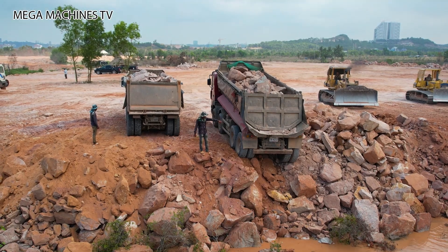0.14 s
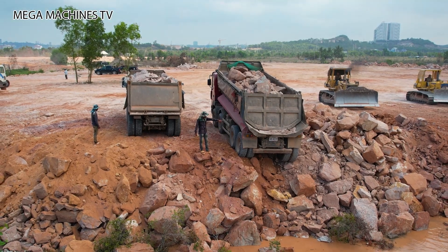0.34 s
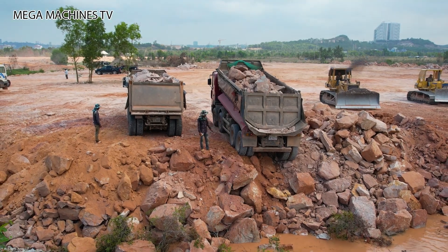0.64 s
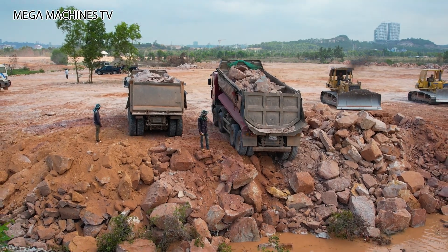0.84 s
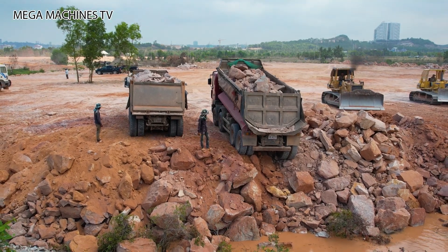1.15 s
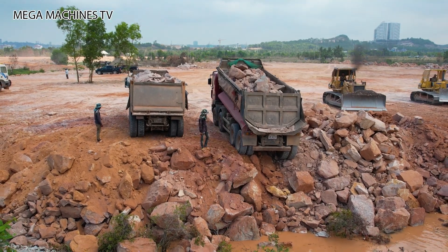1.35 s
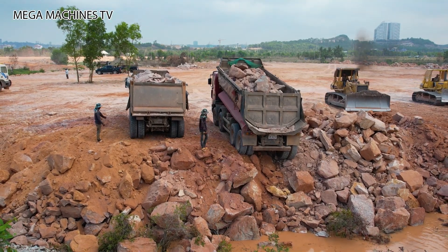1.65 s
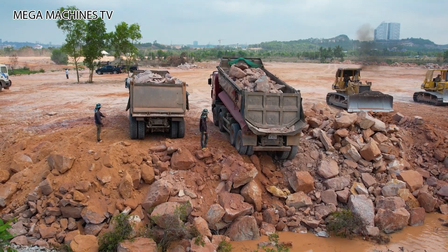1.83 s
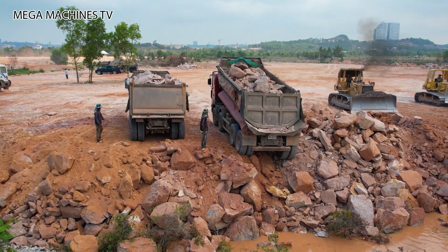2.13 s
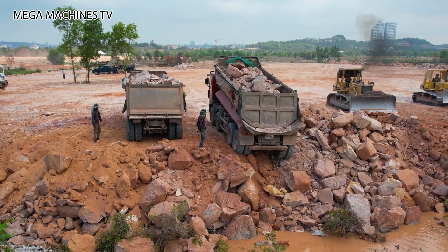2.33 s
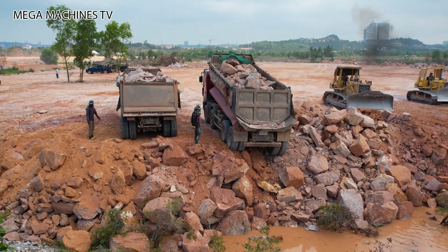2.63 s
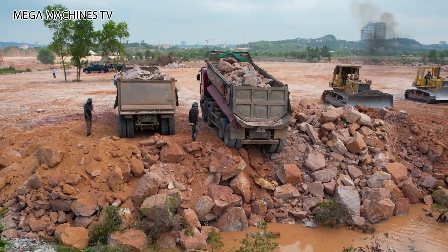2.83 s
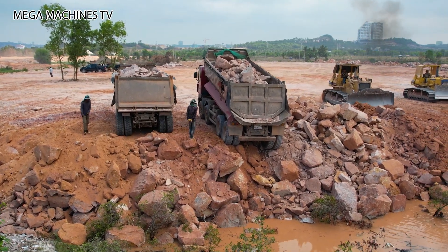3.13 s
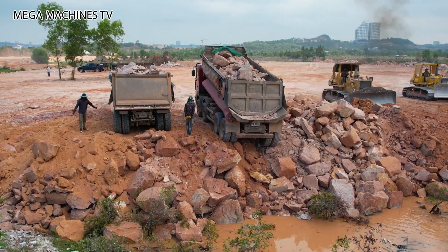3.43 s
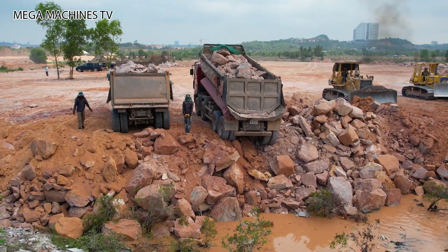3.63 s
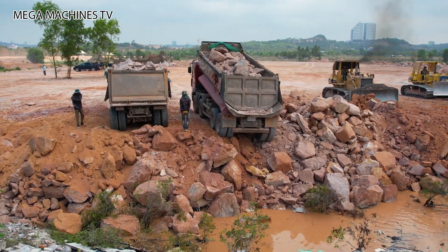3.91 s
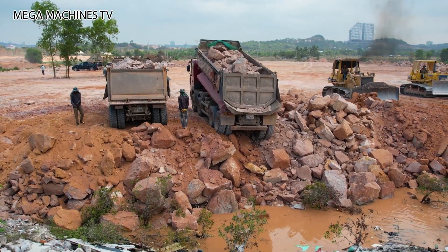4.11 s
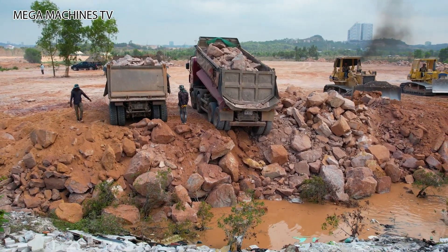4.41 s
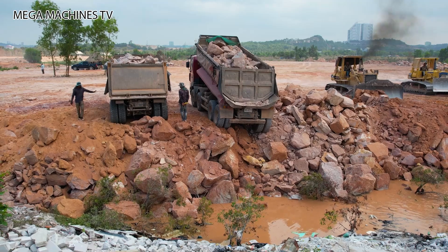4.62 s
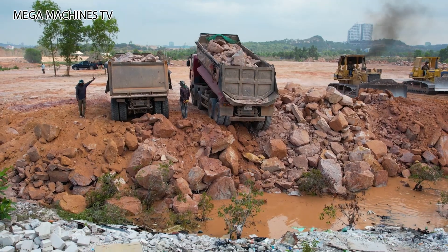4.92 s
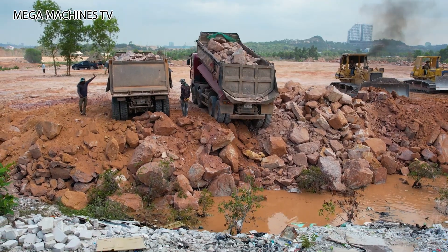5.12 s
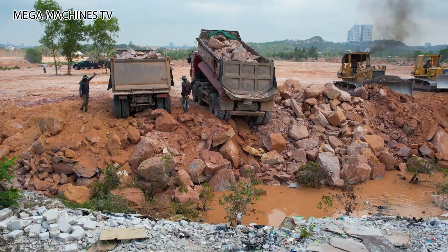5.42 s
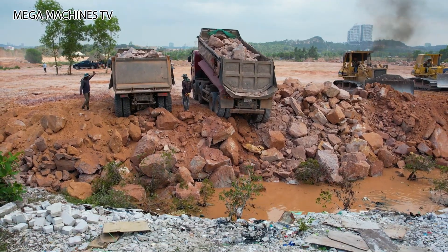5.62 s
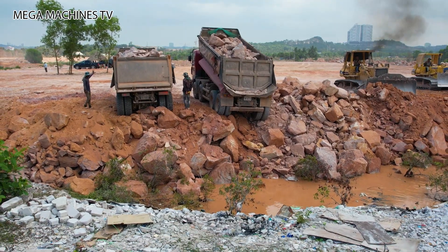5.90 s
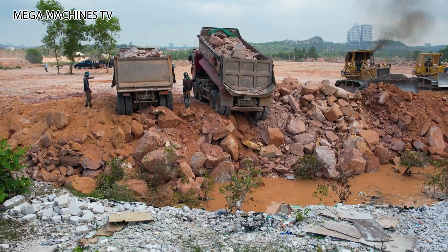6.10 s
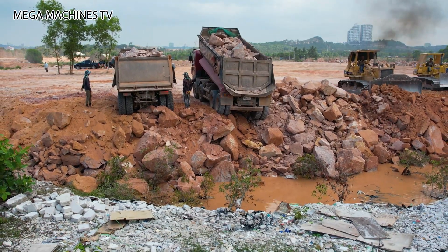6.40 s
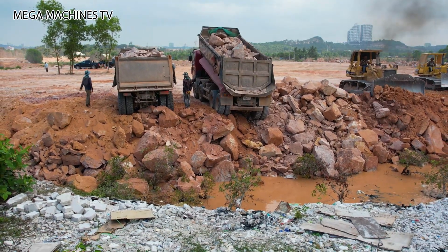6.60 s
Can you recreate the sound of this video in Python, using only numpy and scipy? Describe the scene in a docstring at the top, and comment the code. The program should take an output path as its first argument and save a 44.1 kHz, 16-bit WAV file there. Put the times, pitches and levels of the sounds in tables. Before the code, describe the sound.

Outdoors at an earth and rock site, in wide stereo, a bulldozer's deep, nearly pure diesel boom dominates, with pulsing rumble, growl and piston clatter. At 0.23 s the throttle shuts: the boom drops out and pitch sinks until 0.9 s, with a clack and faint squeaks near 0.3 s. It then revs up, loudest around 2.1 s and highest near 3.9 s, before sagging and weakening, with brief cuts at 4.7 and 5.6 s. Fine track clinks run throughout, stronger after 4 s. A tipping truck's engine bogs down between 2 and 3 s; another truck hums at idle. High squeaks and a dull bump come at 2.3 s, squeaks, knocks and a short scrape around 2.8 s, a gritty crack at 3.46 s. Rock knocks and steel clacks cluster from 4.3 to 5.5 s; tiny squeaks follow at 6.3 s. Soft bright hiss persists.

```python
"""A bulldozer drones on an open earth site: its boom drops out, revs up and sags as it drives off on clinking tracks.
One truck idles and another labours to tip its load; steel squeaks and clacks, and rocks knock over a steady hiss.
Engines are sine tones that follow the firing rate, plus coloured noise that pulses with each firing.
Tracks are random clicks through ringing steel, knocks are short bursts of ringing noise, and squeaks are gliding tones.
The sound is stereo: left and right differ in phase, and the noises also in level and fine detail."""
import sys
import numpy as np
from scipy import signal
from scipy.fft import rfft, irfft
from scipy.io import wavfile

SR = 44100
rng = np.random.default_rng(int(sys.argv[2]) if len(sys.argv) > 2 else 0)


def inscribe(sig):
    """Save sig as 16-bit PCM at rate SR to the path in sys.argv[1].

    A 1-D sig is mono; a 2-D sig holds one channel per row.
    Samples are clipped to [-1, 1] before scaling.
    """
    pcm = np.round(np.clip(np.atleast_2d(sig).T, -1, 1) * 32767)
    wavfile.write(sys.argv[1], SR, pcm.astype(np.int16))


N = 297675
TIME = np.arange(N) / SR  # [s]
FREQS = np.maximum(np.arange(N // 2 + 1) * SR / N, 1)  # [Hz], kept above zero


def exhaust(firings):
    """A nearly pure boom at the firing rate, as loud as the load; unequal cylinders add weak half orders."""
    # load on the engine, as the level of its boom: (time [s], level [dB])
    engine_load = [(0, -20.5), (.2, -20), (.95, -31), (1.3, -22.5), (2.1, -18.5), (3, -21), (3.9, -21.5),
                   (4.5, -24.5), (5.45, -25), (5.8, -29.5), (6.75, -29.5)]
    # exhaust overtones: (multiple of the firing rate, relative level [dB])
    overtone_table = [(.5, -31), (2, -17), (3, -27), (4, -28.5), (6.5, -36), (7, -42), (9, -35)]
    boom_waver_db, boom_flutter_db = 0.5, 0.35  # slow and fast swelling of the boom
    overtone_waver_db = 2.5  # each overtone swells on its own
    overtone_wander = 0.3  # and slips against the boom [turns]

    load_db, = in_time(engine_load)
    level_db = load_db - let_ups()
    boom_db = level_db + boom_waver_db * drift(2.2) + boom_flutter_db * drift(21)
    boom = from_db(boom_db) * sine(firings)

    # the overtones swell less with load than the boom does
    overtone_db = -21.5 + 0.45 * (level_db + 19.5)
    overtones = np.zeros(N)
    for multiple, db in overtone_table:
        gain = from_db(db + overtone_waver_db * drift(5))
        overtones += gain * sine(multiple * firings + overtone_wander * drift(1.2))
    return lag_sides(boom + from_db(overtone_db) * overtones)


def let_ups():
    """Decibels that the boom loses while the driver eases the throttle."""
    # easing of the throttle: (start [s], length [s], depth [dB])
    eased = [(0.234, 0.71, 16), (4.73, 0.13, 11), (5.596, 0.082, 10)]
    drop_s, pick_up_s = 0.023, 0.036  # the boom fades and comes back

    loss_db = np.zeros(N)
    for start, length, depth_db in eased:
        falling = (TIME - start) / drop_s
        returning = 1 - (TIME - start - length) / pick_up_s
        loss_db += depth_db * np.clip(np.minimum(falling, returning), 0, 1)
    return loss_db


def engine_noise(firings, firing_hz):
    """Exhaust gas rumbles and growls with each firing; pistons clatter louder with speed."""
    # level of the exhaust noise: (time [s], low rumble [dB], growl [dB])
    noise_levels = [(0, -36, -37), (.4, -37.5, -38), (.8, -36.5, -40.5), (1.3, -33.5, -42),
                    (1.8, -36.5, -39.5), (2.3, -35, -37.5), (3.2, -34.5, -37.5), (4.2, -35.5, -36),
                    (4.9, -38, -37.5), (5.8, -33.5, -37), (6.75, -39, -39.5)]
    # tone colour of each noise: (frequency [Hz], strength [dB per Hz])
    rumble_colour = [(110, 0), (150, -1.5), (200, 1.5), (240, -2.5), (275, -10)]
    growl_colour = [(280, 1.5), (350, 2), (430, -2), (490, 2.5), (560, -0.5), (640, -2), (790, -1),
                    (900, -10.5)]
    clatter_colour = [(750, -8), (880, 0.5), (990, 2.5), (1080, 1), (1200, 3), (1400, -1), (1600, -2),
                      (2050, -4.5), (2550, -6), (2800, -10), (3300, -13), (3650, -9), (4200, -23),
                      (4700, -58)]
    # share of each noise's power that comes as one pulse per firing
    rumble_pulses, growl_pulses, clatter_pulses = 0.36, 0.17, 0.05
    working_hz = 79.6  # firing rate at which the clatter has its basic level
    clatter_basic_db, clatter_db_per_hz, clatter_surge_db = -39, 0.04, 0.6

    rumble_db, growl_db = in_time(noise_levels)
    rumble = wide_noise(colour(rumble_colour), combustion(firings, rumble_pulses))
    rumble *= from_db(rumble_db + 0.93 * drift(10.3)) * throb(firings, depth=0.22)

    growl = wide_noise(colour(growl_colour), combustion(firings, growl_pulses))
    growl *= from_db(growl_db + 1.06 * drift(25)) * throb(firings, depth=0.067)

    clatter_db = clatter_basic_db + clatter_db_per_hz * (firing_hz - working_hz)
    clatter_gain = colour(clatter_colour) * uneven_spectrum(strength=0.42)
    clatter = wide_noise(clatter_gain, combustion(firings, clatter_pulses))
    clatter *= from_db(clatter_db + clatter_surge_db * drift(8.5))
    return rumble + growl + clatter


def combustion(firings, share):
    """One pulse per firing, uneven in strength and timing; the rest is turbulent gas."""
    spread_db, jitter_s = 2.2, 0.0009  # no two firings are alike
    starts = np.flatnonzero(np.diff(np.floor(firings)))
    chances = rng.standard_normal((1024, 2))[:len(starts)]
    late, strength = np.clip(chances.T, -2, 2)
    places = (starts + late * jitter_s * SR).astype(int) % N
    pulses = np.zeros(N)
    pulses[places] = from_db(spread_db * strength)
    return np.sqrt(share) * rms_one(pulses) + np.sqrt(1 - share) * rng.standard_normal(N)


def tracks(clinks_per_s=170):
    """Steel links drop onto rollers and stones in uneven clusters."""
    # crawler tracks as the bulldozer moves off: (time [s], level [dB])
    track_level = [(0, -52.5), (2, -51.5), (4.6, -47.5), (6.75, -49)]
    # what a track link rings with: (frequency [Hz], width [Hz], level [dB])
    link_modes = [(1244, 29, 1), (1392, 44, 14), (1863, 59, 11.5), (2060, 34, 15), (2318, 19, 12),
                  (2690, 45, -11), (3600, 58, -23)]

    chance = clinks_per_s * from_db(3 * drift(9)) / SR  # of a clink at each sample
    struck = rng.random((2, N)) < chance
    clicks = struck * rng.standard_normal((2, N))
    clicks = clicks + 0.029 * clicks[::-1]  # each side gets a little of the other
    ringing = irfft(rfft(clicks) * resonances(link_modes), N)
    level_db, = in_time(track_level)
    return from_db(level_db) * rms_one(ringing)


def tipper():
    """The tipping truck's engine booms at its firing rate, under overtones that follow the same rate."""
    # the engine sags as it lifts the load: (time [s], firing rate [firings per s])
    tipper_speed = [(0, 101), (1.2, 99), (1.8, 97), (2.3, 89), (2.9, 71), (4.2, 73.3), (6.75, 69)]
    # its sound: (time [s], boom [dB], overtones [dB])
    tipper_levels = [(0, -37, -62), (1, -34, -58), (2, -34.5, -54), (2.6, -48, -49), (3.7, -43, -40),
                     (5, -48, -46), (6.75, -43, -39.5)]
    # those overtones: (multiple of the firing rate, relative level [dB])
    tipper_tone = [(1.5, -3.5), (2, -3.5)]

    firing_hz, = in_time(tipper_speed)
    boom_db, overtone_db = in_time(tipper_levels)
    firings = np.cumsum(firing_hz * (1 + 0.0039 * drift(5.6))) / SR
    boom = from_db(boom_db + 1.8 * drift(2.1)) * sine(firings)
    overtones = np.zeros(N)
    for multiple, db in tipper_tone:
        gain = from_db(overtone_db + db + 2 * drift(4.1))
        overtones += gain * sine(multiple * firings + rng.random())
    return lag_sides(boom + overtones)


def trucks():
    """One truck hums on its engine orders, another throbs lower down, over a low rumble."""
    # idling truck: (time [s], firing rate [firings per s])
    idle_speed = [(0, 33.7), (2.8, 33.6), (4.6, 32.2), (6.75, 31.6)]
    # level of its hum: (time [s], level [dB])
    hum_level = [(0, -40.5), (1, -40.5), (2.6, -43), (4.6, -50), (6, -40), (6.75, -37)]
    # lines of the hum: (multiple of the firing rate, relative level [dB])
    hum_lines = [(6, 0), (9, -19), (14, -11), (15, -16), (18, -14), (24, -18), (35, -19)]
    # colour of the low rumble: (frequency [Hz], strength [dB per Hz])
    ground_colour = [(27, -35), (35, -16), (43, 3), (60, 3.5), (85, 7), (120, -1), (160, -27)]
    hum_waver_db = 2.0  # each line swells on its own
    throb_hz, throb_db = 41.6, -46  # the other truck

    firing_hz, = in_time(idle_speed)
    hum_db, = in_time(hum_level)
    firings = np.cumsum(firing_hz * (1 + 0.002 * drift(5.5))) / SR
    hum = np.zeros(N)
    for multiple, db in hum_lines:
        gain = from_db(hum_db + db + hum_waver_db * drift(7.8))
        hum += gain * sine(multiple * firings + rng.random())

    throb_turns = np.cumsum(throb_hz * (1 + 0.015 * drift(2.8))) / SR
    low_throb = from_db(throb_db + 2 * drift(3.3)) * sine(throb_turns)
    rumble = from_db(-38.5) * throb(firings, depth=0.088) * wide_noise(colour(ground_colour))
    return lag_sides(hum + low_throb) + rumble


def clacks():
    """Steel hits steel: each clack starts at once and rattles out briefly around its own pitch."""
    # clacks: (start [s], pitch [Hz], width [Hz], level of the first 10 ms [dB], time to fall 60 dB [s])
    clack_table = [(0.266, 2900, 1150, -35.5, .055), (3.902, 2580, 250, -40, .05),
                   (4.336, 2590, 250, -42, .04), (4.45, 2000, 300, -41, .07), (4.59, 2000, 350, -38, .09),
                   (4.755, 2100, 300, -41, .05), (4.955, 2000, 300, -41, .07), (5.05, 1780, 300, -39, .06),
                   (5.305, 2950, 800, -38.5, .07), (5.311, 2080, 450, -34.5, .09),
                   (5.447, 2000, 300, -40, .04), (5.858, 2050, 400, -39, .06), (5.973, 1980, 300, -40, .05)]

    out, age = np.zeros(N), TIME[:SR // 5]
    for s, hz, width, db, t60 in clack_table:
        edges = [hz - width / 2, hz + width / 2]
        band = signal.butter(2, edges, "band", fs=SR, output="sos")
        burst = rng.standard_normal(len(age)) * from_db(-60 * age / t60)
        ring = signal.sosfilt(band, burst)
        start = int(s * SR)
        out[start:start + len(age)] += from_db(db) * ring / rms(ring[age < .01])
    return lag_sides(out)


def squeaks():
    """Dry steel sticks and slips at a high pitch that swells, glides, flutters if rough and rings on faintly."""
    # squeaks: (start [s], length [s], pitch [Hz], level before the side balance [dB],
    #           glide [share of pitch], roughness [0-1], octave overtone [dB])
    squeak_table = [(0.35, 0.038, 5980, -46, -0.0071, 0.3, -8), (0.338, .035, 7890, -49, 0, .2, -30),
                    (2.303, 0.065, 5510, -36.5, -0.00092, 0.28, -18),
                    (2.411, 0.039, 5480, -37, 0, 0.3, -16), (2.436, 0.132, 5470, -47, -0.0088, 0.2, -25),
                    (2.55, .1, 5470, -54, -.004, .3, -25), (2.688, 0.04, 5140, -43, -0.022, 0.4, -25),
                    (2.786, 0.023, 6990, -45, 0, .3, -30), (2.81, 0.034, 7050, -40.5, 0.0078, 0.16, -30),
                    (2.873, 0.023, 7000, -50, 0, 0.4, -30), (3.357, 0.29, 769, -48.5, 0.0018, .2, -27),
                    (3.452, 0.038, 5670, -49, 0.0072, .6, -25), (5.554, 0.033, 5350, -53, 0.0064, 0.4, -25),
                    (6.237, 0.03, 4870, -47, 0, 0.35, -25), (6.272, 0.03, 6040, -43.5, -0.017, 0.4, -25),
                    (6.315, 0.03, 4800, -52, 0.0034, 0.5, -25),
                    (6.34, 0.063, 4920, -51, -0.0081, 0.76, -25), (6.324, 0.03, 6000, -53, 0, 0.25, -25)]
    ring_share, ring_s = 0.23, 0.059  # strength and fading time of the ring after each squeak
    pitch_waver, flutter_db = 0.011, 5  # at full roughness: share of pitch, level
    side_phase = np.array([[0], [.12]])  # left, right [turns]

    out, waver, flutter = np.zeros((2, N)), drift(100), drift(70)
    for s, length, hz, db, glide, rough, overtone_db in squeak_table:
        span = slice(int(s * SR), int((s + length + .25) * SR))
        age = np.maximum(TIME[span] - s, 0)
        along = np.minimum(age / length, 1)  # 0 at the start, 1 at the end
        swell = np.abs(np.sin(np.pi * along)) ** 0.49
        swell += ring_share * along * np.exp(-np.maximum(age - length, 0) / ring_s)
        pitch = hz * (1 + rough * pitch_waver * waver[span] + glide * along)
        turns = np.cumsum(pitch) / SR + side_phase
        tone = sine(turns) + from_db(overtone_db) * sine(2 * turns)
        out[:, span] += from_db(db + rough * flutter_db * flutter[span]) * swell * tone
    return out * from_db([[-1.5], [1.2]])  # a little louder on the right


def rocks():
    """Each knock is a gritty crack and a short ring of the stone."""
    # rocks knocking: (start [s], body [dB], crack [dB])
    knock_table = [(1.92, -38, -54), (2.804, -38, -50), (2.882, -44, -49), (3.135, -40.5, -43),
                   (3.462, -45, -35), (4.10, -56, -43), (4.571, -38, -46), (4.695, -39, -44),
                   (4.808, -38, -45)]
    # what a rock rings with: (frequency [Hz], width [Hz], level [dB])
    rock_modes = [(1300, 300, -15), (2020, 300, 21), (2500, 300, -3), (3000, 670, 9), (3750, 250, -15)]
    # colour of the crack: (frequency [Hz], strength [dB per Hz])
    crack_colour = [(3500, 7), (5700, 5), (7300, 5), (10000, 7.5), (15000, -16)]

    s, body_db, crack_db = np.transpose(knock_table)
    body_gain = np.abs(resonances(rock_modes)) * colour([(700, 0), (3600, 0)])
    body = blows(s, body_db, rise=0.0011, t60=0.18) * wide_noise(body_gain)
    crack_gain = colour(crack_colour) * uneven_spectrum(strength=0.96)
    crack = blows(s, crack_db, rise=0.0051, t60=0.2) * wide_noise(crack_gain)
    return body + crack


def load_bumps():
    """A shifting load bumps the tipper: a dull, low burst of noise that dies away."""
    # bumps: (start [s], level [dB])
    bump_table = [(2.322, -23)]
    dull = colour([(115, -14), (150, -1), (190, -4), (240, -12)])
    return blows(*np.transpose(bump_table), rise=0.0024, t60=0.28) * wide_noise(dull)


def scrapes():
    """Stone grates over the steel tipper body and keeps its narrow modes ringing."""
    # scrapes: (start [s], length [s], level [dB])
    scrape_table = [(2.795, 0.064, -37), (2.872, 0.055, -43)]
    # what the steel rings with: (frequency [Hz], width [Hz], level [dB])
    steel_modes = [(1933, 20, 1), (2240, 44, -2), (3140, 37, -3), (3680, 32, -3), (3820, 31, -4),
                   (4120, 50, -13), (5250, 90, -9.5), (5660, 70, -11), (6500, 70, -15)]

    s, length, db = np.transpose(scrape_table)
    along = np.clip((TIME - s[:, None]) / length[:, None], 0, 1)
    pressure = from_db(db) @ np.sqrt(np.abs(np.sin(np.pi * along)))
    steel_gain = np.abs(resonances(steel_modes)) * colour([(1500, 0), (8000, 0)])
    return pressure * from_db(1.2 * drift(60)) * wide_noise(steel_gain)


def hiss():
    """Fans and sliding grit hiss: bright noise whose level flickers slightly."""
    # level of the hiss: (time [s], level [dB])
    hiss_level = [(0, -47), (3.2, -44), (6, -46)]
    # its colour: (frequency [Hz], strength [dB per Hz])
    hiss_colour = [(3300, 3), (4300, 6), (5500, 5.5), (6800, 6.5), (8000, 5), (9200, -2), (10500, 4),
                   (12500, 0), (15500, -5.5)]
    flicker_db = 0.5

    level_db, = in_time(hiss_level)
    gain = colour(hiss_colour) * uneven_spectrum(strength=0.34)
    return from_db(level_db + flicker_db * drift(24)) * wide_noise(gain)


def uneven_spectrum(strength, count=10):
    """A random fine unevenness of the noise's spectrum, different in each layer, as gain by frequency."""
    # each random delay and size adds one ripple along the frequency axis
    delays = rng.uniform(0.001992, .025, count)  # [s]
    sizes = rng.standard_normal(count) / np.sqrt(count)
    ripples = np.zeros(N)
    ripples[(delays * SR).astype(int)] = strength * sizes
    return np.abs(1 + rfft(ripples))


def wide_noise(gain, source=None):
    """A source (noise if none is given) in a colour, spread over two sides that are only partly alike."""
    # the two sides: (frequency [Hz], likeness [0-1])
    likeness = [(80, .995), (200, .98), (330, .95), (550, .85), (750, .45), (1000, .65), (1400, .35),
                (2000, .55), (2800, .15), (3700, .4), (5500, .25), (6600, .8), (9000, .9), (15000, .85)]
    # loudness of the sides: (frequency [Hz], left minus right [dB])
    balance = [(80, 3), (300, 1.5), (550, 0.5), (700, -2.5), (900, 1), (1200, -4), (2200, 0), (2900, 1),
               (4000, 1), (6000, -2), (8000, 0)]

    alike = np.clip(at_hz(likeness), 0, 1)
    common, *scattered = rng.standard_normal((3, N))
    if source is not None:
        common = rms_one(source)
    shared = np.sqrt(alike) * lag_sides(common, spectrum=True)
    separate = np.sqrt(1 - alike) * rfft(np.array(scattered))
    side_gain = from_db(np.array([[.5], [-.5]]) * at_hz(balance))
    return rms_one(irfft((shared + separate) * gain * side_gain, N))


def lag_sides(x, spectrum=False):
    """The sound is spread between left and right by a phase lag that depends on frequency."""
    # lag between the sides: (frequency [Hz], phase by which left lags [radians])
    lag = [(30, .42), (84, .54), (150, .8), (230, .85), (300, 1.2), (450, 1.35), (560, 1.85), (750, 2.1),
           (1000, 3.0), (1550, 2.7), (2100, .1), (6600, -.2), (7600, 1.2), (9050, 3.1), (11000, 6.2),
           (13100, 9.4), (15400, 12.5)]
    pair = rfft(x) * np.exp(1j * np.array([[-.5], [.5]]) * at_hz(lag))
    return pair if spectrum else irfft(pair, N)


def resonances(modes):
    """Gain by frequency of a ringing body."""
    gain = 0
    for hz, width, db in modes:
        gain = gain + from_db(db) / (1 + 1j * (FREQS ** 2 - hz ** 2) / (FREQS * abs(width)))
    return gain


def colour(spectrum):
    """Gain by frequency, falling steeply past the ends."""
    past_ends = np.minimum(FREQS / spectrum[0][0], spectrum[-1][0] / FREQS)
    return from_db(at_hz(spectrum)) * np.minimum(1, past_ends) ** 8


def blows(times, levels_db, rise, t60):
    """Envelope of blows that swell quickly and fall by 60 dB in t60 seconds."""
    age = np.maximum(TIME - np.array(times)[:, None], 0)
    swell = 1 - np.exp(-age / abs(rise))
    decay = from_db(-60 * np.minimum(age / t60, 3))
    return from_db(levels_db) @ (swell * decay)


def throb(turns, depth):
    """A swell once per firing, of unit power."""
    return rms_one(np.exp(depth * np.cos(2 * np.pi * turns)))


def sine(turns):
    """A sine of rms 1."""
    return np.sqrt(2) * np.sin(2 * np.pi * turns)


def drift(rate):
    """Random wandering with spread 1, mostly slower than the given rate [Hz]."""
    smooth = rfft(rng.standard_normal(N)) / (1 + (FREQS / rate) ** 4)
    return rms_one(irfft(smooth, N))


def in_time(rows):
    """Each column of a curve at every sample."""
    s, *columns = np.transpose(rows)
    return [np.interp(TIME, s, c) for c in columns]


def at_hz(points):
    """A table read along a log-frequency axis."""
    hz, value = np.transpose(points)
    return np.interp(np.log(FREQS), np.log(hz), value)


def from_db(db):
    """Decibels to gain."""
    return 10 ** (np.asarray(db) / 20)


def rms(x):
    """Root mean square."""
    return np.sqrt(np.mean(x ** 2) + 1e-20)


def rms_one(x):
    """Scale to unit power."""
    return x / rms(x)


def scene():
    """The whole site; one count of firings drives all the bulldozer's engine sounds."""
    # bulldozer engine, sinking while the throttle is shut, then revving up:
    # (time [s], firing rate [firings per s])
    engine_speed = [(0, 75.5), (.23, 74.5), (.9, 50), (1.05, 54.5), (1.23, 61.5), (1.4, 66), (1.7, 72.6),
                    (1.95, 77.2), (2.47, 82.6), (3.07, 85.6), (3.9, 87.6), (4.25, 84.6), (4.7, 82.6),
                    (4.95, 76.5), (5.6, 78), (6.3, 77.6), (6.75, 74.5)]

    firing_hz, = in_time(engine_speed)
    firings = np.cumsum(firing_hz) / SR
    bulldozer = exhaust(firings) + engine_noise(firings, firing_hz) + tracks()
    other_trucks = tipper() + trucks()
    steel = clacks() + squeaks()
    stones = rocks() + load_bumps() + scrapes()
    return bulldozer + other_trucks + steel + stones + hiss()


def record(dry):
    """The top is cut steeply above 15.8 kHz."""
    return signal.sosfilt(signal.ellip(10, .1, 90, 15800, fs=SR, output="sos"), dry)


dry = scene()
out = record(dry)
inscribe(out)
```